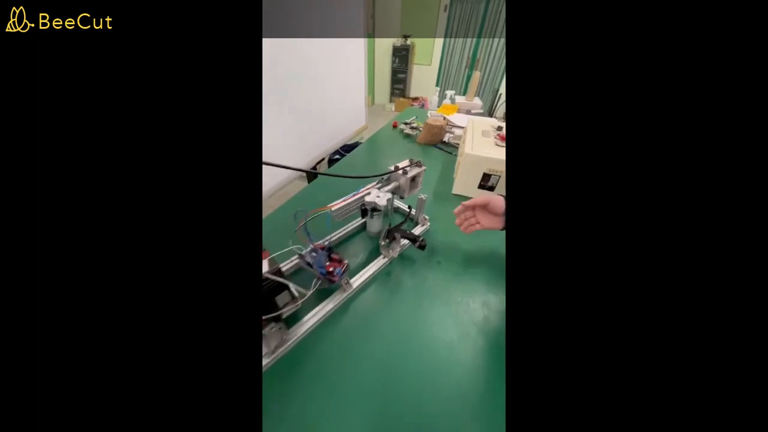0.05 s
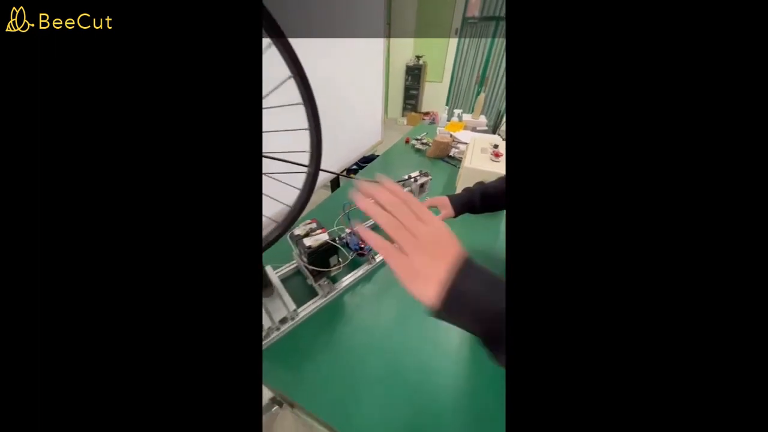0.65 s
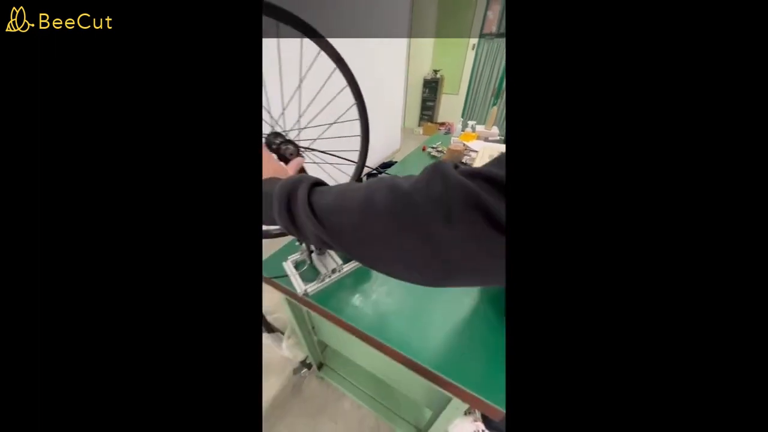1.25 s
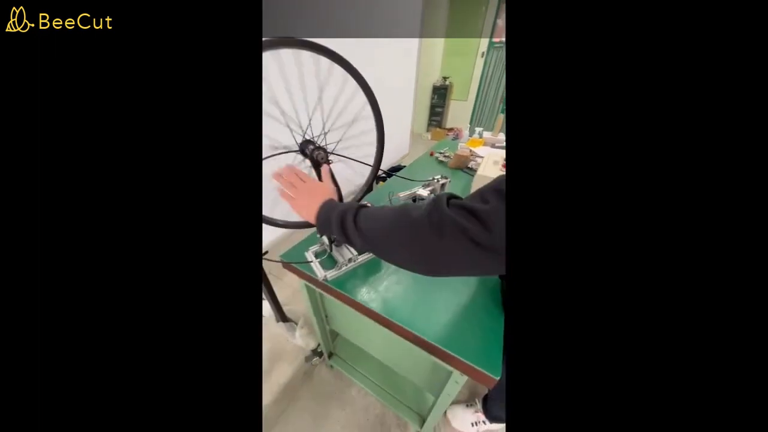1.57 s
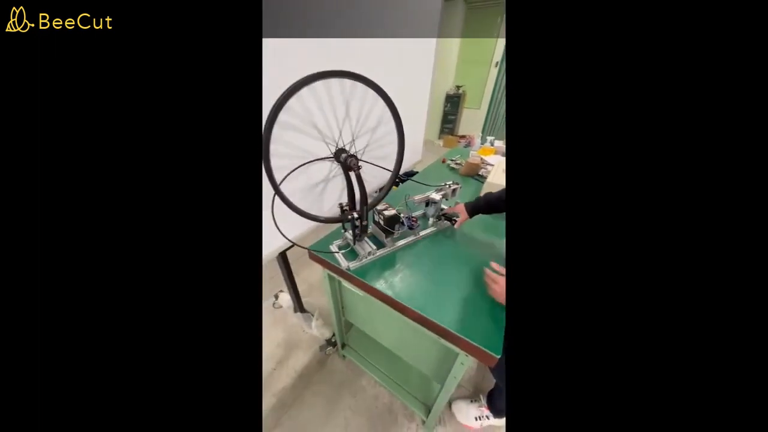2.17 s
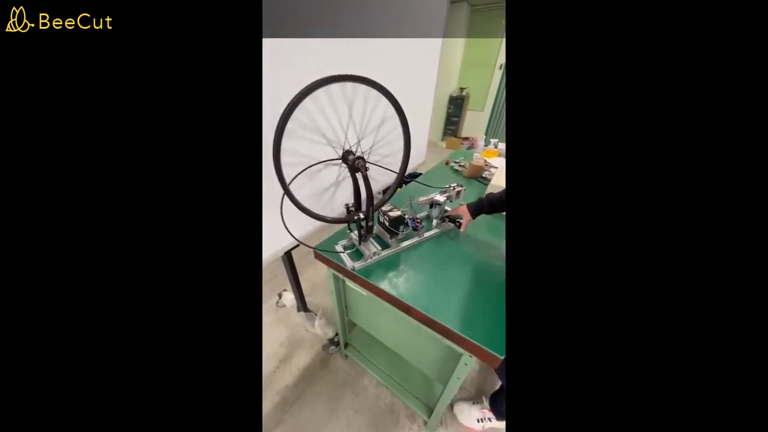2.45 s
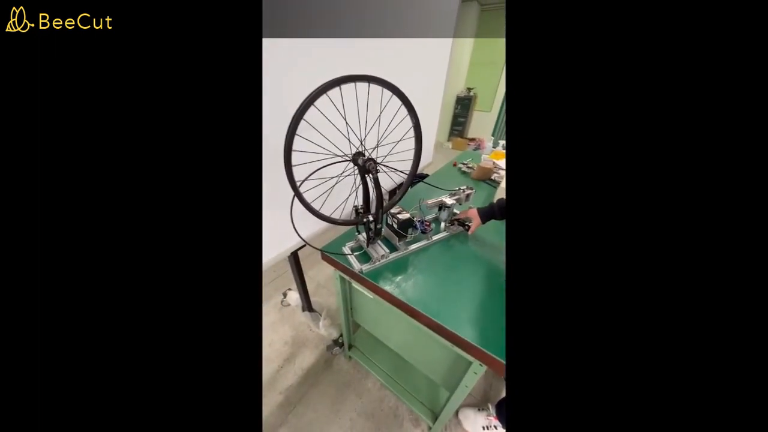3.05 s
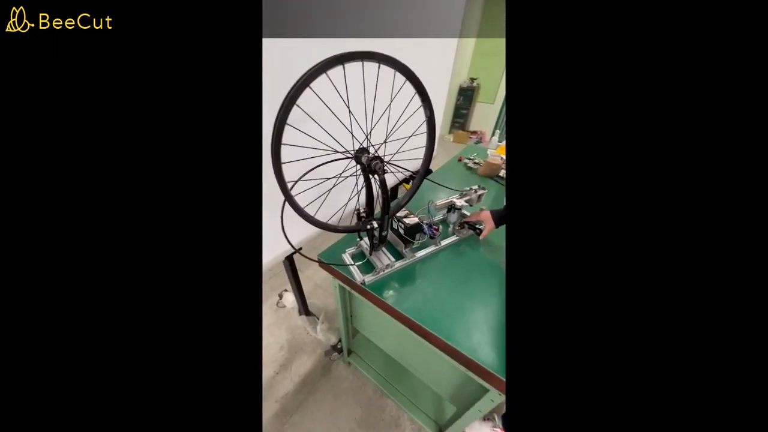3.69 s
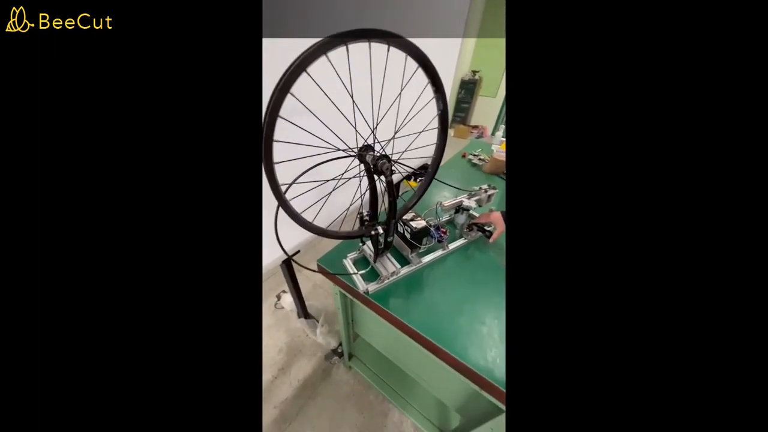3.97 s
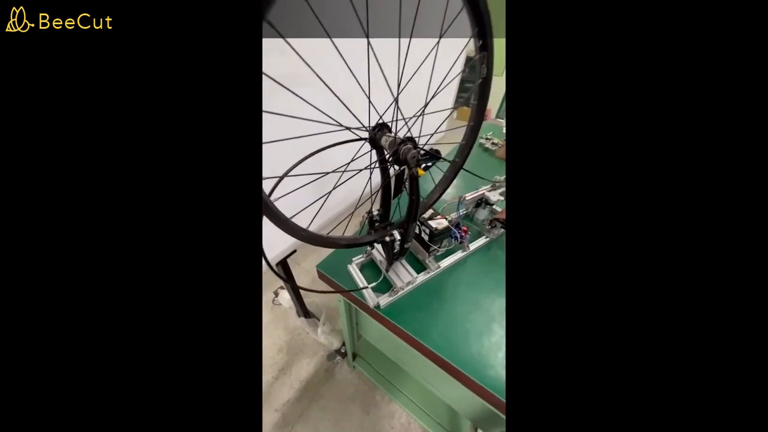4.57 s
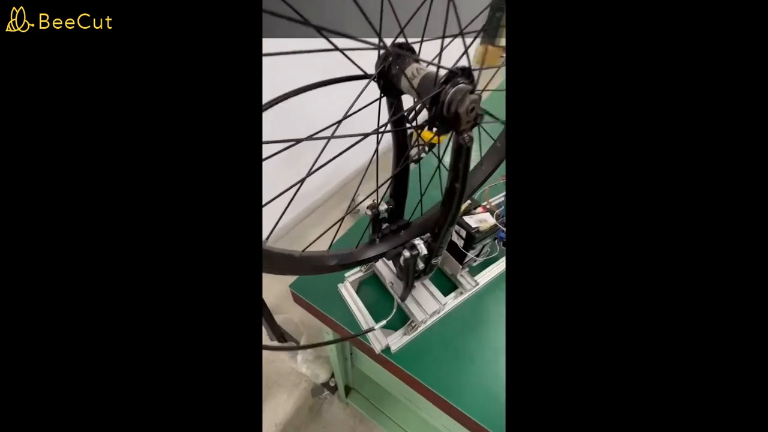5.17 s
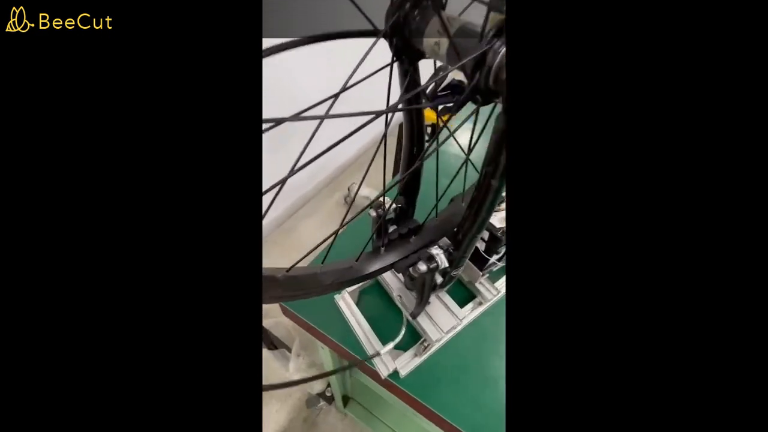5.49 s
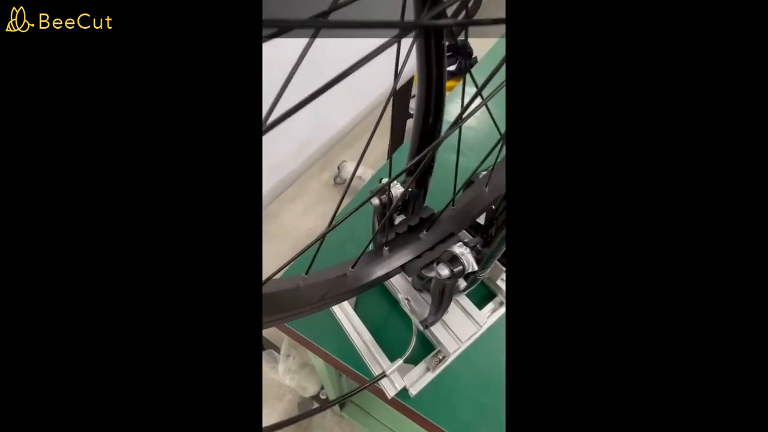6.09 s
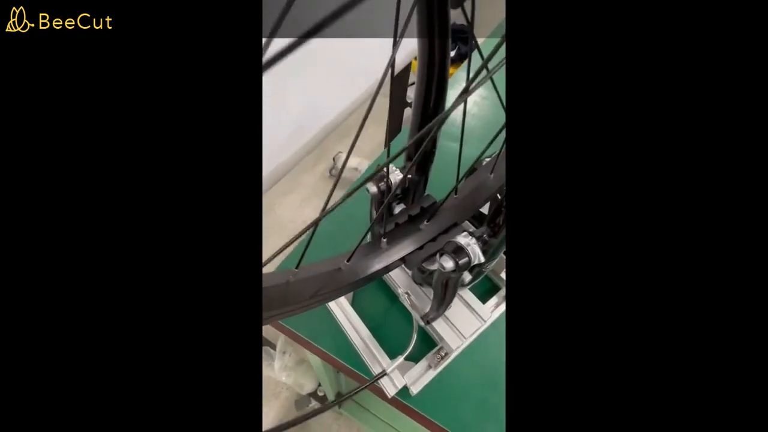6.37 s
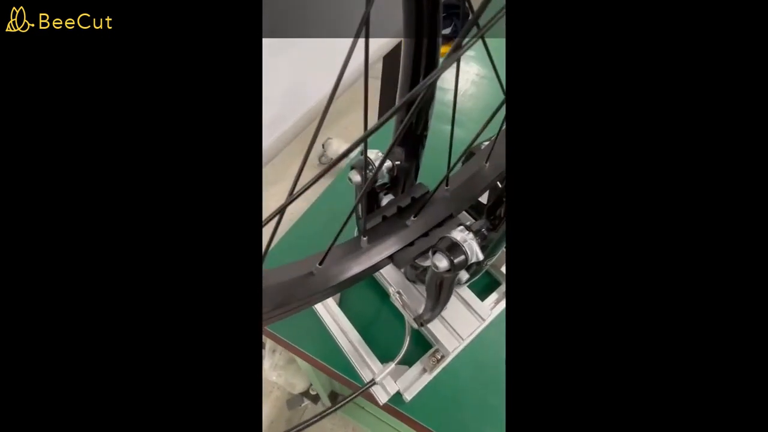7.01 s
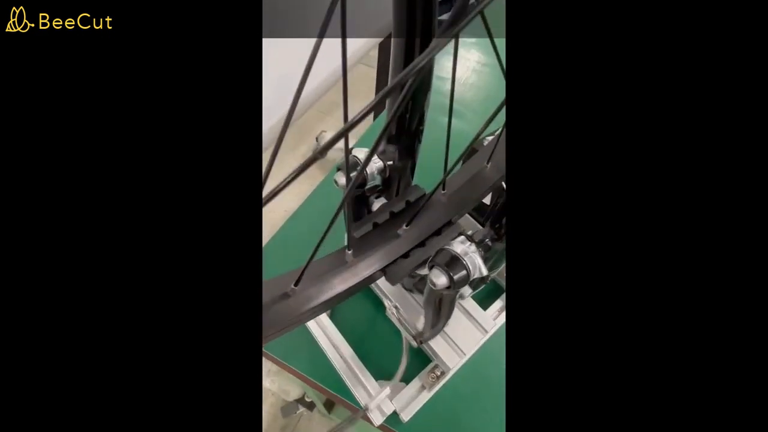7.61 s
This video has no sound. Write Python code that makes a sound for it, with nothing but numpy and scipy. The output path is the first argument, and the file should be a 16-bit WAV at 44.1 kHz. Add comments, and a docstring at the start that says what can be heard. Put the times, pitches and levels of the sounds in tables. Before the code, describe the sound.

Over a low ventilation rumble in a hard room, a sleeve brushes past and a hand spins a bicycle wheel, which pings once. A switch snaps and a drive clicks on with a brief hum. A brake then knocks on the rim about eleven times a second in five bursts, with steel rattling and the workbench thudding beneath. The clacks sound a little closer and drier later on.

```python
"""A workbench in a hard room, where a motor-driven rig pulses the rim brake of a spinning bicycle wheel.
Over ventilation rumble a sleeve brushes by and a hand spins the wheel, which pings once.
A switch snaps, the drive clicks on, then the brake knocks eleven times a second in bursts.
Each stroke rattles up, clacks, rebounds and shakes the bench. As the microphone moves closer,
the clacks change colour and the room falls back."""
import sys
import numpy as np
from scipy import signal
from scipy.fft import rfft, irfft, next_fast_len
from scipy.io import wavfile
from scipy.ndimage import uniform_filter1d

SR = 44100
rng = np.random.default_rng(int(sys.argv[2]) if len(sys.argv) > 2 else 0)


def store_pcm(level_fs):
    """Save levels as 16-bit WAV."""
    pcm = np.round(np.clip(level_fs, -1, 1) * 32767).astype(np.int16)
    wavfile.write(sys.argv[1], SR, np.atleast_2d(pcm).T)


N = 346185
TIME = np.arange(N) / SR


def amp(db):
    return 10 ** (np.asarray(db) / 20)


def unit_rms(x):
    return x / np.sqrt(np.mean(x ** 2) + 1e-20)


def wobble(shape, span):
    """Random modulation at unit rms, smoothed over span samples."""
    return unit_rms(uniform_filter1d(rng.standard_normal(shape), size=span))


def curve(points, hz):
    """Reads a table on a log-frequency axis."""
    f, value = np.transpose(points)
    return np.interp(np.log(hz + 1), np.log(f + 1), value)


def fade(t, t60):
    """Exponential decay that starts at t = 0."""
    return (t >= 0) * np.exp(-np.log(1000) * np.maximum(t, 0) / t60)


def add(mix, s, sound):
    """Mixes a sound in at time s."""
    part = mix[..., round(s * SR):][..., :sound.shape[-1]]
    part += sound[..., :part.shape[-1]]


def convolve(x, response):
    return signal.fftconvolve(np.atleast_2d(x), response, axes=1)[:, :N]


# stereo image: f/Hz, left-right correlation before clipping
STEREO_IMAGE = [(100, 1.94), (300, 1.2), (500, .5), (800, 0.6), (1300, 0.82), (2100, 0.69), (2600, -.5),
                (3500, 0.07), (5000, 0.1), (5900, -1), (6800, 0.1), (8300, 0.54), (10200, 0), (11500, 1),
                (15000, 0)]
def correlation(hz):
    """How alike the two microphone ports sound at each frequency."""
    return np.clip(curve(STEREO_IMAGE, hz), -1, 0.96)


def noise(spectrum, size=N, shifted=0.32):
    """Coloured stereo noise; part of it reaches the right port shifted in phase."""
    length = next_fast_len(size, True)
    hz = np.fft.rfftfreq(length, 1 / SR)
    left, other = rfft(rng.standard_normal((2, length)))
    same = correlation(hz)
    wide = np.sqrt(1 - shifted ** 2) * other - 1j * shifted * left
    right = same * left + np.sqrt(1 - same ** 2) * wide
    return unit_rms(irfft(np.array([left, right]) * amp(curve(spectrum, hz)), length)[:, :size])


def ring(modes, size, detune=0, spread_db=0):
    """Struck modes, each lagging in the right port; no two blows are quite alike."""
    t, out = TIME[:size], np.zeros((2, size))
    for (hz, db, t60), (shift, gain) in zip(modes, rng.standard_normal((len(modes), 2))):
        lag = np.array([[0], [np.arccos(correlation(hz))]])
        phase = 2 * np.pi * (hz * (1 + detune * shift) * t + rng.random())
        out += amp(db + spread_db * gain) * fade(t, t60) * np.sin(phase - lag)
    return out


# sleeve moves: t/s, length/s, rustle/dB, swish/dB
SLEEVE_MOVES = [(.02, 0.2, -69, -88), (0.535, 0.18, -69.5, -88), (0.643, 0.3, -82, -76.5),
                (1.06, 0.27, -76, -100)]
# cloth rustle, airy swish, dull bump and ventilation bed: f/Hz, level/dB
RUSTLE_EQ = [(100, -6), (400, 5.5), (800, -1), (1500, -4), (4000, -6), (5500, -16), (16000, -37)]
SWISH_EQ = [(3000, -22), (6200, -15), (7200, -5), (12500, -5), (15500, -19)]
BUMP_EQ = [(130, 7), (300, 11), (550, 0), (800, 7), (1100, -17), (4000, -22), (6000, -35)]
VENT_EQ = [(25, -26), (43, -3.5), (70, 1), (190, -9), (350, -16.5), (450, -22), (800, -24.5), (1500, -30),
           (3900, -35.5), (5400, -46), (16000, -49)]
def background(whine_hz=3531, bump_s=0.555, attack_s=0.058, release_t60=0.44):
    """Ventilation rumble, a thin electrical whine, and a sleeve that brushes along and bumps the bench."""
    rustle, swish, sleeve = noise(RUSTLE_EQ), noise(SWISH_EQ), np.zeros((2, N))
    for s, length, rustle_db, swish_db in SLEEVE_MOVES:
        attack = np.clip((TIME - s) / attack_s, 0, 1)
        release = fade(np.maximum(TIME - s - length, 0), release_t60)
        sleeve += attack * release * (amp(rustle_db) * rustle + amp(swish_db) * swish)
    folds = amp(2.5 * wobble(N, span=1500))
    bump = amp(-62) * noise(BUMP_EQ) * fade(TIME - bump_s, t60=1.7)
    whine = amp(-89) * np.sin(2 * np.pi * whine_hz * TIME)
    return amp(-61) * noise(VENT_EQ) + whine + sleeve * folds + bump


# brake cue list, shared by every layer of a stroke:
# t/s, clack level/dB, treble trim/dB, top trim/dB, rebound trim/dB, frame load/dB
STROKES = [(2.8898, -17.5, -1.5, 5, -4.5, -5), (2.986, -15.5, -1.5, 0.5, -9, -2.5),
           (3.0783, -16.5, -4, -1, -9, -4), (3.169, -17.5, -1, -6, -5.5, -0.5),
           (3.2596, -16, -4, -8, -5.5, 1.5), (3.3522, -16.5, -4, 4.5, -8, -9),
           (3.4435, -16, -5.3, 5.5, -9, -0.2), (3.534, -17.5, -0.2, 3, -0.5, 2),
           (3.6243, -17, -1.5, 1, -2, -2.5), (3.715, -18, 1, 2, -3, -0.5), (3.96, -17.5, 3, 5, -7.5, -4.5),
           (4.055, -16, -3.5, 1, -5.5, -1), (4.1461, -17.5, 2.5, 2.5, -6.5, 3),
           (4.2369, -16, -1.5, -5, -5, 0), (4.3282, -17.5, 4.5, -1, -1.5, 1),
           (4.4193, -15.5, -1.5, 0, -2.5, 2), (4.51, -17.5, 0, -1, -4.5, -3.5),
           (4.6017, -17.5, -2, 0.5, -4.5, 2.5), (4.693, -16.5, 0, 6.5, -6.5, 2),
           (4.7835, -17.5, -1.5, -2, -2.5, -1.5), (4.8756, -17, -0.9, -3.5, -5, 1.5),
           (5.126, -17, -2.5, 6, -1.5, 1.8), (5.2213, -14, -3.5, 0.5, -9.5, -1.5),
           (5.3122, -15, -1, 2, -7, 1), (5.4025, -18.5, -3, -4, -2, 3), (5.4937, -14.5, -2.2, -1, -4, 2.5),
           (5.585, -14.5, -4.5, 0.7, -7, -0.5), (5.6746, -15.5, -2.5, 1, -2, 0.5),
           (5.765, -17, -1, 4, -6.5, 0), (5.8569, -15, -5, 2.5, -3, 1.5), (5.9484, -16, -3, -4, -3.5, -2),
           (6.0382, -15, -5, -4, -8, 3.5), (6.2994, -14.5, -5.5, -4, -8, 1),
           (6.3946, -14.5, -5.5, 0, -10, -1), (6.487, -14, -6, -3, -23, 2.5),
           (6.5773, -14.5, -5.5, -5, -7.5, 3.5), (6.6671, -16.5, -4, -10, -2, -1.5),
           (6.76, -15.5, -4, -3, -8, 1), (6.8516, -15.5, -4.5, -15, -6.5, 1.5),
           (6.942, -14, -3.5, -2, -6.5, 2), (7.0334, -15, -5, -5, -8, 1), (7.1242, -13.5, -5, -1, -8, -2.5),
           (7.2186, -16, -4, -10, -21, 1.5), (7.4965, -15, -6.5, -3, -5, 0.5),
           (7.592, -16, -3.5, -4, -4, -2.5), (7.685, -14.5, -6, -0.5, -5, 0.5),
           (7.777, -14, -5.5, -16, -7.5, 1)]
# nudges to the bench: t/s, frame load/dB
NUDGES = [(.555, -27), (1.776, -27), (2.615, -20), (2.768, -12), (2.869, -6)]
# bench and frame resonances: f/Hz, level/dB, t60/s
BENCH_MODES = [(65.66, -11, 2.6), (87, -14, 1.2), (120.2, -13, 1.2), (141.9, -14, 1.2), (207, -13, 0.47),
               (231, -1.5, 1.0), (284.5, -.5, 0.4), (338, -2.5, 0.22), (410, -1.5, 0.45), (454, 0, 0.3),
               (491.7, 0, 0.27), (729.6, 6, 0.086)]
# boom of the bench top: f/Hz, level/dB
THUD_EQ = [(30, -32), (48, -24), (62, 9), (130, -3.5), (180, -9), (260, 2.5), (480, 0.5), (600, -23),
           (760, -2), (1100, -17), (2500, -29)]
def bench(modes_db=-38, thud_db=-39.5, delay_s=0.013, rise_s=0.0013, same=0.58):
    """The bench booms when nudged, and as each stroke loads the frame just after the clack."""
    blows = [(s + delay_s, load_db) for s, *_, load_db in STROKES] + NUDGES
    t, out = TIME[:SR], np.zeros((2, N))
    top = noise(THUD_EQ, SR)
    # the rig shifts on the bench, so it rings in a few slightly different ways
    seatings = [ring(BENCH_MODES, SR, detune=0.009, spread_db=2) for _ in range(5)]
    attack, decay = 1 - np.exp(-t / rise_s), amp(thud_db) * fade(t, t60=0.68)
    for s, db in blows:
        modes = seatings[rng.integers(len(seatings))]
        thud = (same * top + np.sqrt(1 - same ** 2) * noise(THUD_EQ, SR)) * decay
        add(out, s, amp(db) * attack * (amp(modes_db) * modes + thud))
    out *= amp(2.2 * wobble(N, span=700))  # chattering feet roughen the rumble
    # a high-pass keeps the thuds free of deep rumble
    return signal.sosfilt(signal.butter(6, 52, "high", fs=SR, output="sos"), out)


# skin sliding on the rim: f/Hz, level/dB
PALM_EQ = [(1200, -14), (3000, -4), (3800, 0), (4400, -15), (5400, -30)]
def rim_rub(peak_s=1.2, width_s=0.19):
    """The palm hisses along the rim as it pushes the wheel round."""
    return amp(-77) * noise(PALM_EQ) * np.exp(-((TIME - peak_s) / width_s) ** 2)


# the hand flicks past the spokes: t/s, level/dB
SPOKE_FLICKS = [(1.772, -72), (1.776, -64), (1.799, -71)]
# rim and spokes, the main note a beating cluster: f/Hz, level/dB, t60/s
WHEEL_MODES = [(1370, -14, .8), (1820, -6, 1.9), (1851, -5, 1.9), (1880, -12, 1.2), (1992, -1, .42),
               (2390, -5, .4), (3030, -8.5, .75), (3560, -7, .5), (3698, -3.5, .65), (3760, -3, .45),
               (4290, -10, .6), (4619, -13, .6), (5453, -12, .6), (6891, -10, .33), (7332, -6, .22),
               (7515, 5, .19), (8366, 2, .14), (9604, -5, .2), (12900, -2, .1)]
# bright steel crack and midrange rattle, shared with the drive and brake: f/Hz, level/dB
CRACK_EQ = [(40, -47), (150, 1.5), (500, -18), (1000, -1), (2000, -1.5), (3000, -4), (4100, -7.5),
            (5200, -1), (6000, 8.5), (8600, 4), (9700, 4.5), (11400, -3.5), (12300, -17), (15500, -23)]
RATTLE_EQ = [(40, -14.5), (150, -4.5), (500, -3.5), (800, -3.5), (1100, -5), (2000, 6), (3300, 1),
             (4600, -8), (6500, -12), (8600, -9), (10000, -21), (12500, -22), (15500, -22)]
def wheel(ping_s=1.772, ping_db=-56, stroke_db=-63, scuff_rise_s=0.015, scuff_fall_s=0.02):
    """The wheel pings as the hand leaves it, and rings faintly under every brake stroke."""
    taps, flicks, t = np.zeros(N), np.zeros(N), TIME - ping_s
    add(taps, ping_s, amp([ping_db]))
    for s, db in SPOKE_FLICKS:
        add(flicks, s, amp([db - 4]))
    for (s, *_), (jitter, force) in zip(STROKES, rng.standard_normal((len(STROKES), 2))):
        add(taps, s + 0.0012 * jitter, amp([stroke_db + 3 * force]))
    # spokes of unequal tension ring briefly around the rim's own notes
    spokes = sum(ring(WHEEL_MODES, SR, detune=0.022, spread_db=3) for _ in range(4))
    spokes *= amp(-6) * fade(TIME[:SR], t60=1)
    scuff_shape = np.exp(np.minimum(t / scuff_rise_s, -t / scuff_fall_s))
    scuff = amp(-55) * (noise(CRACK_EQ) + noise(SWISH_EQ)) * scuff_shape
    jingle = amp(-65) * noise(RATTLE_EQ) * fade(t, t60=1)
    knock = amp(-52) * noise(RATTLE_EQ) * fade(t, t60=0.092)
    rim = convolve(taps, ring(WHEEL_MODES, SR))
    return rim + convolve(taps + flicks, spokes) + knock + scuff + jingle


def clicks(cues, body_eq, steel_t60=0.025, rise_s=0.00047):
    """Dry clicks: a tick of steel on steel over the duller body of the part."""
    steel, body, out = noise(CRACK_EQ), noise(body_eq), np.zeros((2, N))
    for s, body_db, t60, steel_db in cues:
        t = np.maximum(TIME - s, 0)
        tick = amp(steel_db) * fade(t, steel_t60) * steel
        out += (1 - np.exp(-t / rise_s)) * (amp(body_db) * fade(t, t60) * body + tick)
    return out


# press and snap of the switch: t/s, body level/dB, body t60/s, steel level/dB
SWITCH_CLICKS = [(2.593, -44.5, 0.095, -60), (2.6196, -37, 0.046, -26)]
# switch case: f/Hz, level/dB
SWITCH_EQ = [(100, -18), (750, -11), (1050, -9), (1400, 0), (2200, -5), (2700, 11), (3150, -8), (4050, 8),
             (4800, -15), (15000, -16)]
# spring and contacts: f/Hz, level/dB, t60/s
SPRING_MODES = [(2610, -9, .4), (2680, 9, .07), (3500, -4, .15), (3790, -9, .3), (4000, -3, .42),
                (4480, -15, .35), (7140, -3, .17), (8650, 0, .12), (9490, -8, .12)]
def switch(press_db=-65, snap_db=-52):
    """The start switch is pressed and snaps over; its spring coils jangle, slightly detuned."""
    out = clicks(SWITCH_CLICKS, SWITCH_EQ)
    for (s, *_), spring_db in zip(SWITCH_CLICKS, (press_db, snap_db)):
        coils = sum(ring(SPRING_MODES, SR, detune=0.018) for _ in range(5))
        add(out, s, amp(spring_db) * coils)
    return out


# hollow drive housing: f/Hz, level/dB
HOUSING_EQ = [(200, -15), (550, -11), (760, 8), (1000, -9), (1600, -16), (4000, -25)]
def housing_tocks(latch_s=2.603, lead_s=0.023):
    """The drive housing gives a woody tock as it latches and as each pull begins."""
    power = (amp(-43) * fade(TIME - latch_s, t60=0.044)) ** 2
    pull = (amp(-35) * fade(TIME[:8192], t60=0.04)) ** 2
    for s, *_ in STROKES:
        add(power, s - lead_s, pull)
    return noise(HOUSING_EQ) * np.sqrt(power)


def motor_start(start_s=2.748, hz=488, rise_s=0.008):
    """The motor housing knocks and hums briefly as the drive takes up the load."""
    t = np.maximum(TIME - start_s, 0)
    shake, drift = wobble((2, N), span=450)
    cycles = np.cumsum(hz * (1 + 0.03 * drift)) / SR
    hum = (1 + 0.45 * shake) * np.sin(2 * np.pi * cycles)
    return amp(-40.5) * (1 - np.exp(-t / rise_s)) * fade(t, t60=0.37) * hum


# the drive engaging: t/s, body level/dB, body t60/s, steel level/dB
DRIVE_CLICKS = [(2.756, -40, 0.14, -44), (2.785, -43, 0.11, -62), (2.864, -34, 0.043, -42)]
def drive_clicks():
    """Steel parts meet in three light clicks as the drive engages."""
    return clicks(DRIVE_CLICKS, RATTLE_EQ)


def rattle(swell_s=0.018, slack_s=0.0057, rebound_s=0.0125):
    """Play in the linkage: a swelling scrape, a steely tap as the slack closes, a rebound, chatter."""
    power, tick_power, t = np.zeros(N), np.zeros(N), TIME[:4096]
    tap, tick, rebound = (fade(t, t60) ** 2 for t60 in (0.049, 0.016, 0.03))
    swell = np.exp(-2 * t / swell_s)[::-1]
    for s, db, treble_db, _, rebound_db, _ in STROKES:
        slack_jitter, rebound_jitter = rng.standard_normal(2)
        add(power, s - t[-1], amp(db - 14.5) ** 2 * swell)
        taut_s = s - slack_s + 0.00072 * slack_jitter
        add(power, taut_s, amp(db - 9) ** 2 * tap)
        add(tick_power, taut_s, amp(db + treble_db - 5) ** 2 * tick)
        add(power, s + rebound_s + 0.0013 * rebound_jitter, amp(db + rebound_db + 3.5) ** 2 * rebound)
        # nine loose taps scattered around the clack
        for offset_s, force in zip(rng.triangular(-0.024, 0, 0.026, 9), rng.random(9)):
            add(power, s + offset_s, amp(db - 16 + 8.4 * force) ** 2 * tap)
    return noise(RATTLE_EQ) * np.sqrt(power) + noise(CRACK_EQ) * np.sqrt(tick_power)


def swing(t, hz, width_s):
    """A few cycles of low tone under a bell curve centred on t = 0."""
    return np.exp(-(t / width_s) ** 2) * np.sin(2 * np.pi * hz * t)


# fader ride on the bench top's sway: t/s, level/dB
SWAY_RIDE = [(2.9, -7), (3.1, -1), (3.3, 0.5), (3.7, -2.5), (4.0, -6), (4.2, -7), (4.55, 0), (4.85, 2.5),
             (5.15, -1.5), (5.5, 3.5), (5.8, -3.5), (6.3, -3), (7.0, -1), (7.8, 1)]
def throb(sway_hz=129, knock_hz=232, pull_s=0.01016, push_s=0.02768, knock_s=0.02196):
    """Each stroke tugs the bench top one way, then shoves it back as the frame knocks down on it."""
    out, preroll_s = np.zeros(N), 3072 / SR
    t = TIME[:8192] - preroll_s
    for s, *_, load_db in STROKES:
        push_tune, pull_tune, knock_tune = rng.normal(1, [0.04, 0.04, 0.12])
        pull = amp(-2) * swing(t + pull_s, sway_hz * pull_tune, width_s=0.014)
        push = swing(t - push_s, sway_hz * push_tune, width_s=0.014)
        knock = swing(t - knock_s, knock_hz * knock_tune, width_s=0.0069)
        sway_db = np.interp(s, *np.transpose(SWAY_RIDE)) - 31.5
        add(out, s - preroll_s, amp(sway_db) * (push - pull) + amp(load_db - 32) * knock)
    return out


# microphone move: t/s, nearness/dB
MIC_MOVE = [(2.9, 0), (4.0, -0.5), (5.0, 2), (6.0, 5), (7.8, 3.5)]
def nearness(s):
    """Closeness of the microphone in dB; it tints the clacks and pulls down the room send."""
    return np.interp(s, *np.transpose(MIC_MOVE))


# brake arm and lever: f/Hz, level/dB, t60/s
ARM_MODES = [(1384, -8, 0.016), (1720, 3.5, 0.014), (2060, 1.5, 0.025), (2270, 4.5, 0.014),
             (2560, -3.5, 0.036), (3037, -2, 0.022), (3530, -15, 0.045), (4630, -8, 0.025),
             (5750, 6, 0.015), (6245, -4.5, 0.033), (7257, 0, 0.031), (8420, 8.5, 0.015),
             (8840, 3.5, 0.019), (9900, -6, 0.018), (11410, -1, 0.012), (13030, -16, 0.016),
             (15250, -6.5, 0.011)]
# sizzle of first contact: f/Hz, level/dB
SNAP_EQ = [(1500, -29), (4500, -14.5), (6000, 8.5), (9000, 2), (11500, -1), (12500, -18.5), (15500, -14),
           (16500, -13)]
# close-up tint: f/Hz, gain/dB per dB of nearness
CLOSE_EQ = [(500, 0.13), (2000, 1.21), (3000, 1.51), (4200, 2.18), (6000, -1), (8600, 1), (11000, -1.33),
            (13000, 1.8), (15500, 1.4)]
def clacks(rise_s=0.0013, snap_s=0.0015, same=0.53, treble_hz=4500, top_hz=10000, size=4096):
    """The arm slams home: a gritty snap, ringing modes, and a crack that partly repeats each stroke."""
    out, t, hz = np.zeros((2, N)), TIME[:size], np.fft.rfftfreq(2 * size, 1 / SR)
    steel = noise(CRACK_EQ, size)
    attack = 1 - np.exp(-(t / rise_s) ** 2)
    treble, top = (1 / (1 + (edge / (hz + 1)) ** 12) for edge in (treble_hz, top_hz))  # high shelves
    for s, db, treble_db, top_db, *_ in STROKES:
        crack = (same * steel + np.sqrt(1 - same ** 2) * noise(CRACK_EQ, size)) * fade(t, t60=0.032)
        grit = unit_rms(amp(3 * wobble(size, span=12)))
        snap = amp(4.8) * grit * noise(SNAP_EQ, size) * np.exp(-((t - snap_s) / snap_s) ** 2)
        arm = ring(ARM_MODES, size, detune=0.0091, spread_db=3)
        blow = (amp(4.5) * crack + amp(1) * arm) * attack + snap
        eq_db = treble_db * (treble - top) + top_db * top + nearness(s) * curve(CLOSE_EQ, hz)
        # the arm never meets its stop at quite the same spot, which shifts the highs
        eq_db += 1.7 * treble * np.interp(hz, np.linspace(0, SR / 2, 16), rng.standard_normal(16))
        padded = np.pad(blow, ((0, 0), (size, 0)))
        add(out, s - size / SR, amp(db) * irfft(rfft(padded) * amp(eq_db)))
    return out


# loose steel that sings on between strokes: f/Hz, level/dB, t60/s
FITTING_MODES = [(1572, -4.5, 0.49), (2600, -1, 0.41), (3370, -11, 0.45), (6880, -3, 0.53),
                 (7550, -16, 0.25), (8500, -8, 0.28)]
def fittings():
    """Every stroke sets the small steel parts ringing, each time with a different weight."""
    out = np.zeros((2, N))
    for s, *_ in STROKES:
        add(out, s, amp(-41) * ring(FITTING_MODES, size=16384, detune=0.017, spread_db=5))
    return out


# low accents as the rig lands: t/s, level/dB
LANDINGS = [(2.902, -24), (3.315, -24.5), (5.688, -24), (6.051, -26), (6.768, -21), (7.508, -15.5)]
def landings(hz=232, rise_s=0.0099):
    """Now and then the rig hops and lands on the bench with a hollow knock."""
    out, t = np.zeros(N), TIME[:16384]
    knock = (1 - np.exp(-t / rise_s)) * fade(t, t60=0.15) * np.sin(2 * np.pi * hz * t)
    for s, db in LANDINGS:
        add(out, s, amp(db) * knock)
    return out


# reverb colour: f/Hz, level/dB
ROOM_EQ = [(40, 2), (100, 13), (700, 7.5), (1200, 0.5), (2100, -3.5), (2800, -1), (3700, 6), (4800, 3),
           (6000, -1), (7000, -3.5), (8700, -3), (10500, -11), (15500, -9)]
# reverb decay: f/Hz, t60/s
ROOM_DECAY = [(100, 1.0), (500, 1), (2000, 1), (4000, 1), (8000, 0.73), (15000, 0.99)]
def room(x, wet_db=-6.5, onset_s=0.004, tails=3):
    """Hard walls return diffuse tails that die band by band and keep shifting from knock to knock."""
    send, out = x[0] / amp(nearness(TIME)), np.zeros((2, N))
    for k in range(tails):
        hz, t, bands = signal.stft(noise(ROOM_EQ, SR), SR, nperseg=256)
        envelope = fade(t, curve(ROOM_DECAY, hz)[:, None]) * (1 - np.exp(-t / onset_s))
        tail = signal.istft(bands * envelope, SR, nperseg=256)[1]
        share = np.sqrt(2 / tails) * np.cos(np.pi * (2.3 * TIME + k / tails))
        out += convolve(send * share, tail / np.linalg.norm(tail[0]))
    return amp(wet_db) * out


def scene():
    """The mix: a metal bus and a boom bus feed the room; fittings, palm and background stay dry."""
    metal = clacks() + rattle() + housing_tocks() + switch() + drive_clicks() + wheel()
    boom = bench() + motor_start() + throb() + landings()
    return metal + boom + fittings() + room(metal + amp(-7) * boom) + rim_rub() + background()


# pan by frequency: f/Hz, left minus right/dB
PORT_BALANCE = [(80, 0.5), (250, -3), (650, -5), (1100, 1), (2050, -0.2), (2600, -3.5), (3600, -2.5),
                (4500, -1), (6000, -0.5), (15000, 0)]
def record(dry, cutoff_hz=15850):
    """Unequal microphone ports, soft overload on the peaks, then a steep low-pass."""
    tilt_db = curve(PORT_BALANCE, np.fft.rfftfreq(N, 1 / SR))
    ports = amp(np.array([tilt_db, -tilt_db]) / 2)
    ports /= np.sqrt(np.mean(ports ** 2, axis=0))
    saturated = np.tanh(irfft(rfft(dry) * ports, N))
    lowpass = signal.firwin(255, cutoff_hz, window=("kaiser", 9), fs=SR)
    return signal.oaconvolve(saturated, lowpass[None], "same")


dry = scene()
out = record(dry)
store_pcm(out)
```